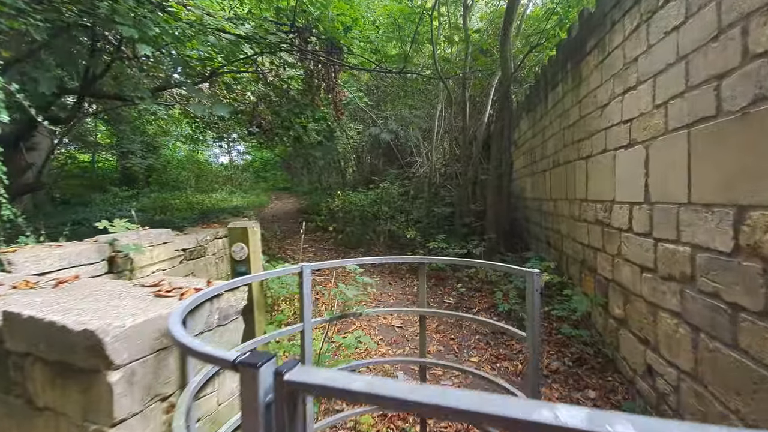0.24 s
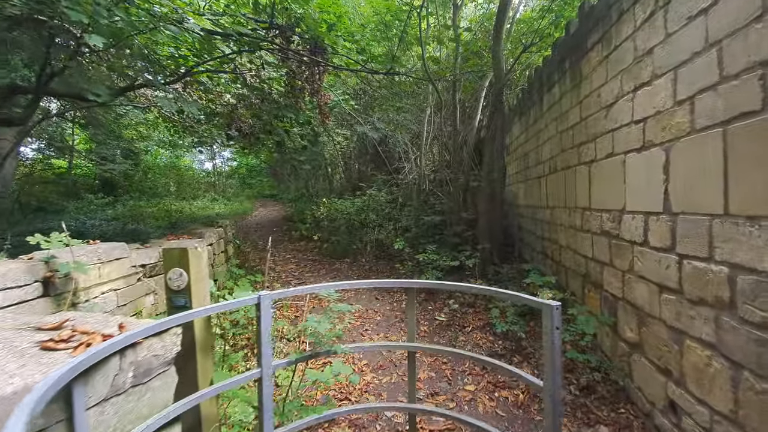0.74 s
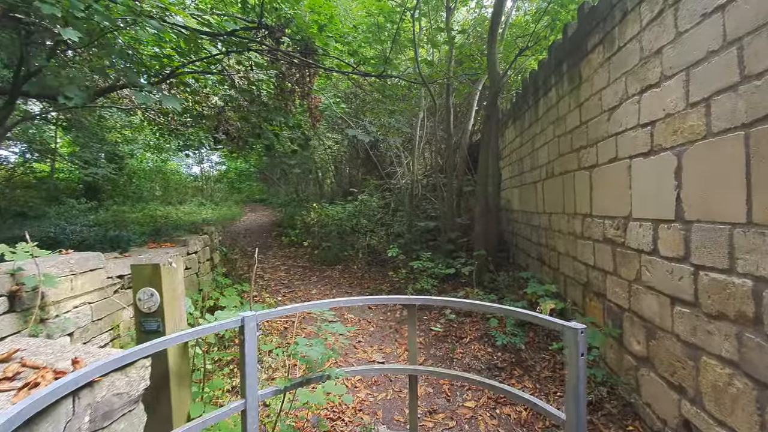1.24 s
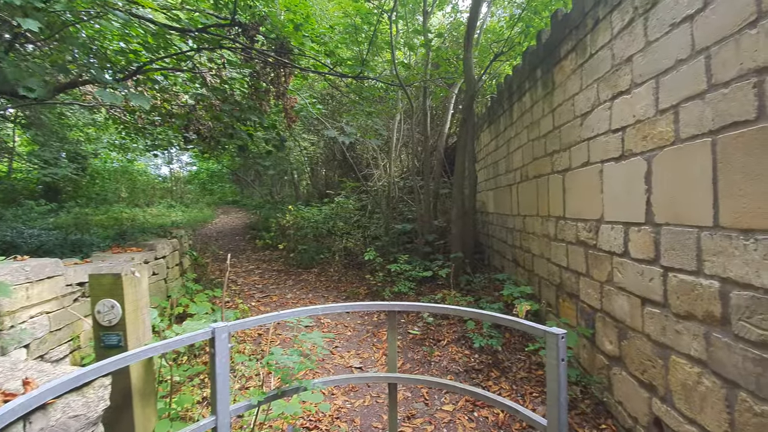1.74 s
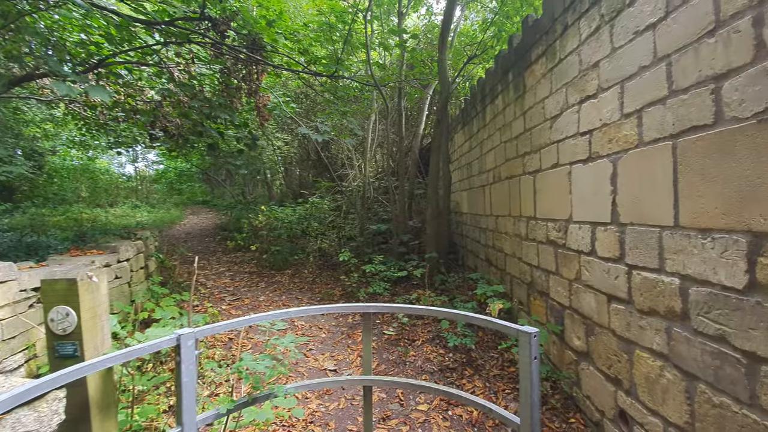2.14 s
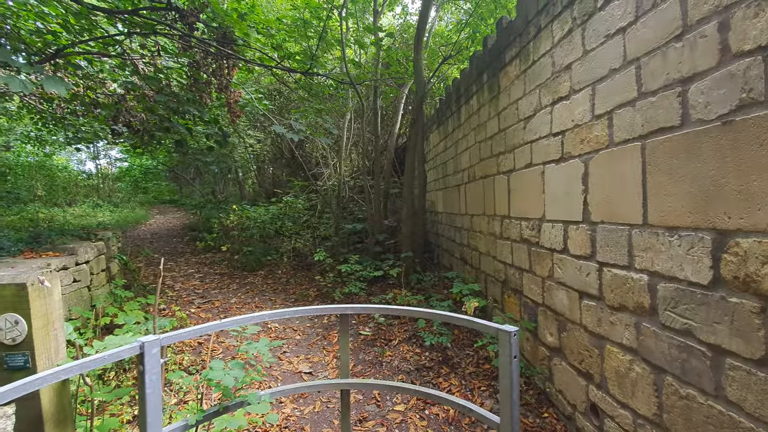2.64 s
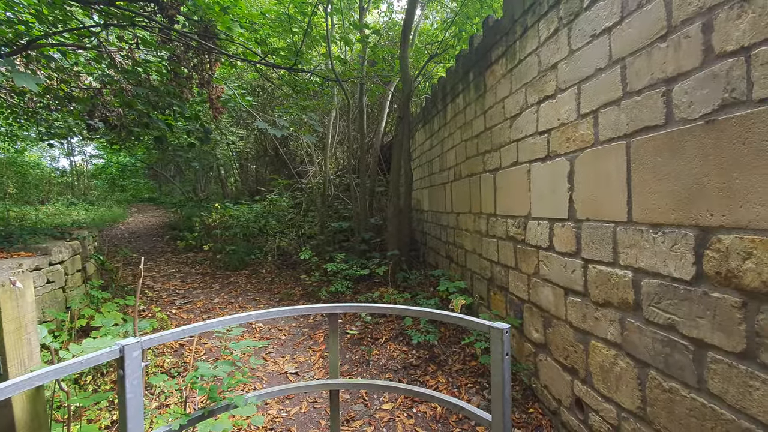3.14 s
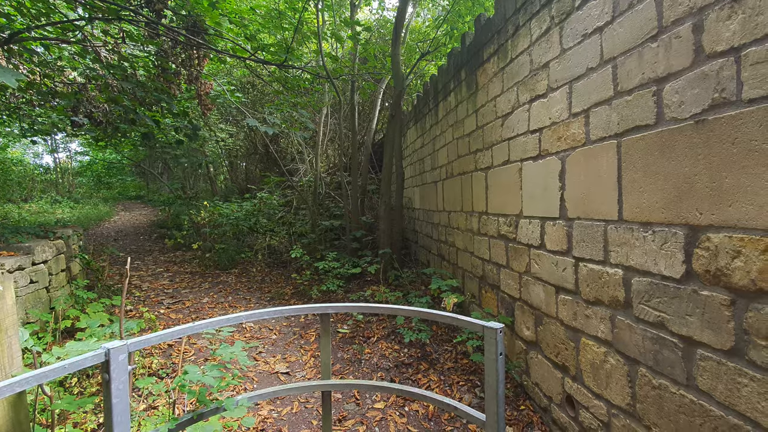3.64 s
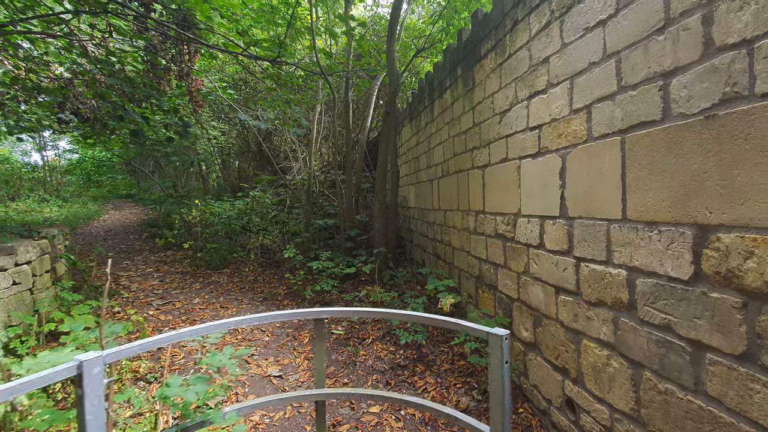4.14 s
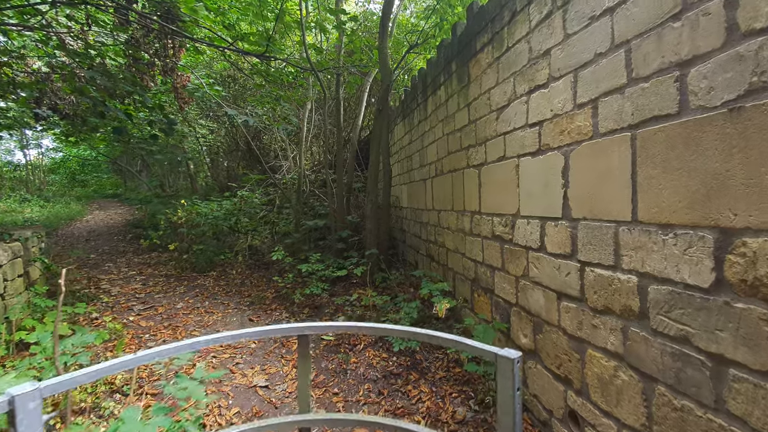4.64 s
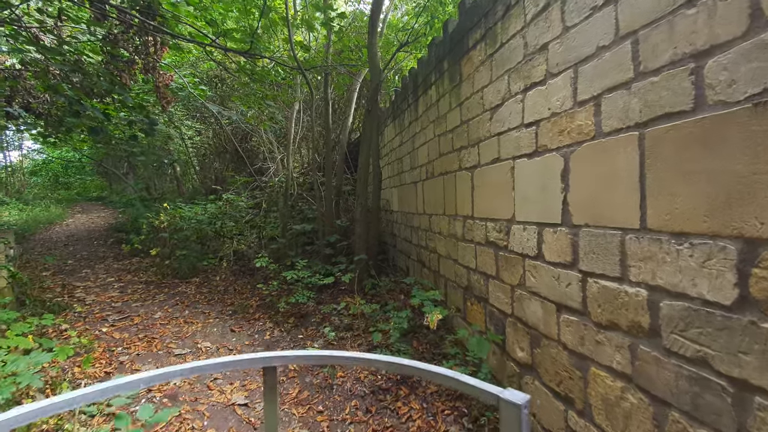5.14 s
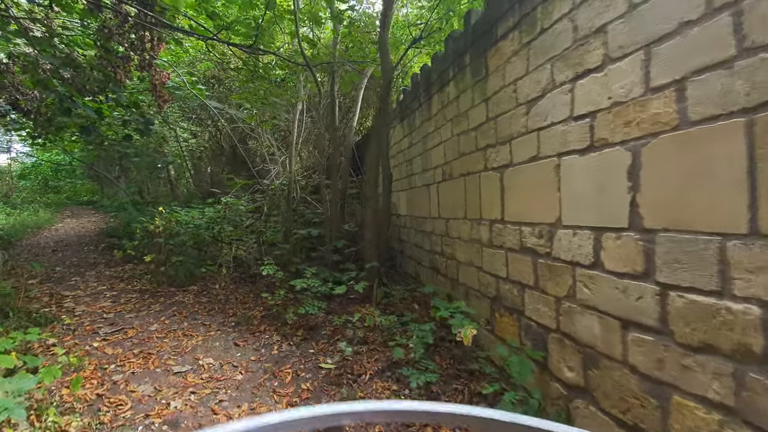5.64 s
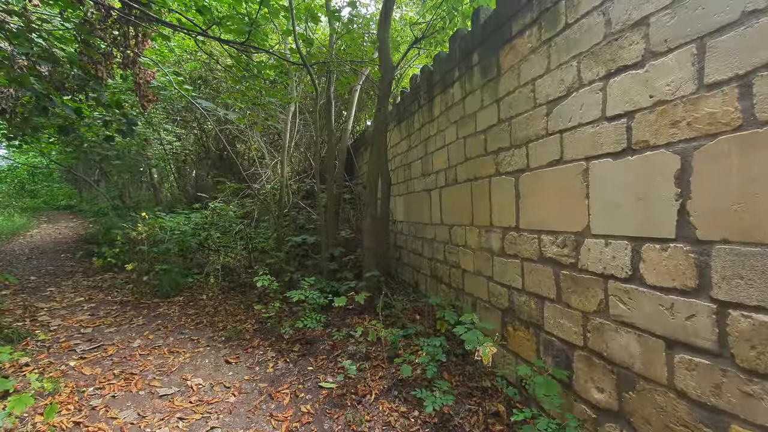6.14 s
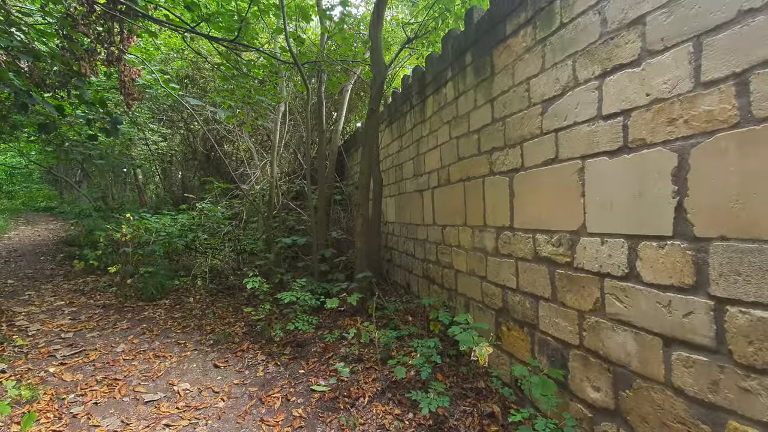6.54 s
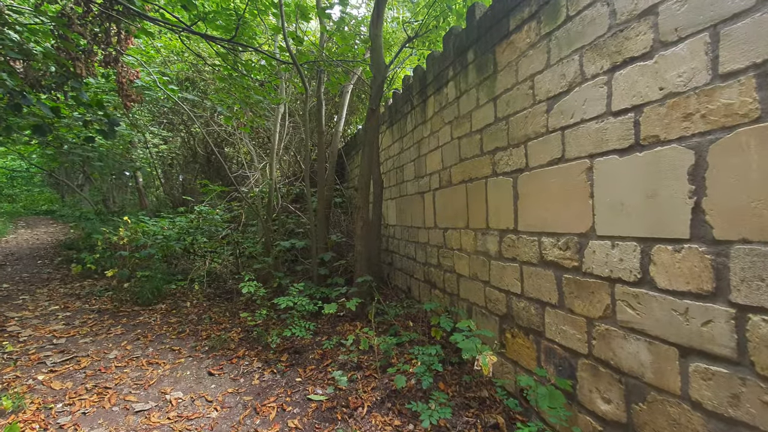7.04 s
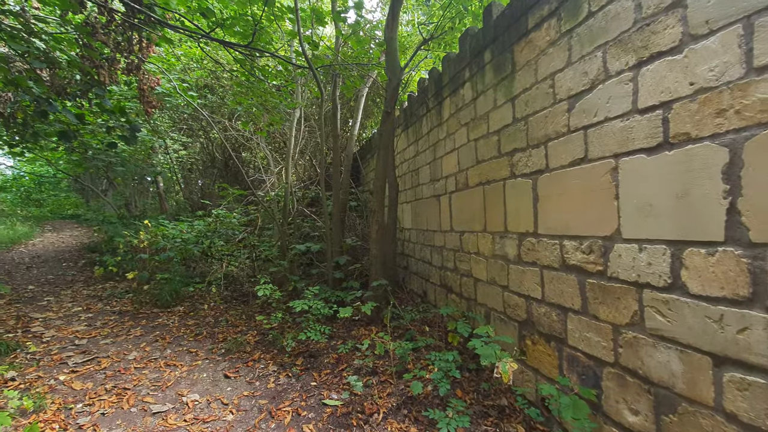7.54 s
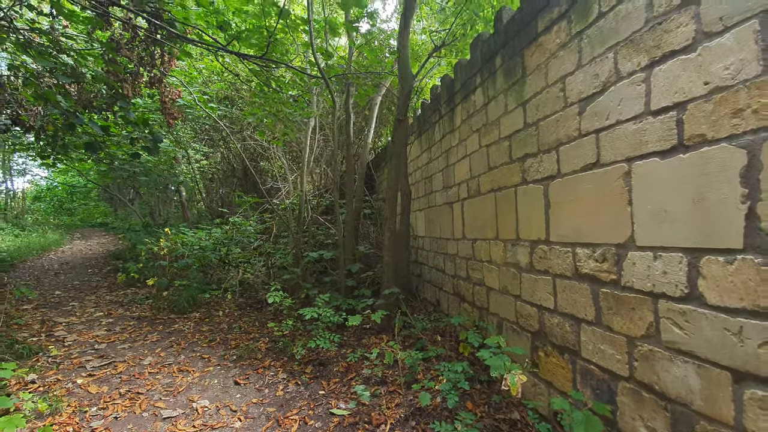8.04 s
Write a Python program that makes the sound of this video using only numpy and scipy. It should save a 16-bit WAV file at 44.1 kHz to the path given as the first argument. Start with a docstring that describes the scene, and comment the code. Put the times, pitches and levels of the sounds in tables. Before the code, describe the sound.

Outdoors on a leafy path beside a stone wall, faint birds twitter over distant traffic and hissing foliage as shoes rustle dry leaves. A hand-held steel gate knocks softly a few times, then clinks more firmly. After more scuffs and dull bumps on the microphone, the gate swings shut with a very loud, bright clang, rebounds with a rattle and rings out for about a second. Close handheld microphone, one channel.

```python
"""Small birds call over the hiss of leaves and far traffic, and dry leaves rustle under a walker's shoes.
The path runs between a stone wall and trees, where a held steel kissing gate knocks softly on its hoop.
Then it swings free, hums on its hinge, clangs shut and rebounds; bumps reach the microphone.
Steel is decaying sines plus noise bands, birds are gliding sines, leaves are random crackles,
snaps and air are filtered noise, bumps and hums are swelling tones."""
import sys
import numpy as np
from scipy import signal
from scipy.io import wavfile
from scipy.ndimage import uniform_filter1d, minimum_filter1d

SR = 44100
rng = np.random.default_rng(int(sys.argv[2]) if len(sys.argv) > 2 else 0)


def nominal_scale(level):
    """Amplitude ratio for a level in decibels (scalar or array-like)."""
    x = np.asarray(level, float) / 20
    return 10 ** x


def generate_wav(sig):
    """Save sig (samples, or channels by samples) to the path in sys.argv[1] as 16-bit PCM at SR."""
    pcm = np.round(np.clip(np.atleast_2d(sig).T, -1, 1) * 32767).astype(np.int16)
    wavfile.write(sys.argv[1], SR, pcm)


N = 366471


def rms_one(x):
    """Scale a sound to rms 1."""
    return x / np.sqrt(np.mean(x ** 2) + 1e-20)


def in_time(rows):
    """Read a (time_s, value) curve at every sample."""
    return np.interp(np.arange(N) / SR, *np.transpose(rows))


def at_hz(points, hz):
    """Read a (pitch_hz, value) curve on a logarithmic pitch axis."""
    curve_hz, values = np.transpose(points)
    return np.interp(np.log(hz), np.log(curve_hz), values)


def add(out, start_s, sound):
    """Mix a sound in from its start time."""
    i = round(start_s * SR)
    out[i:i + len(sound)] += sound[:N - i]


def drift(rate_hz):
    """Smooth random wander with rms 1: low-passed noise made at SR / 40, then interpolated."""
    r = np.exp(-80 * np.pi * rate_hz / SR)
    noise = rng.standard_normal(N // 40 + 2002)
    slow = signal.lfilter([1], [1, -2 * r, r * r], noise)[2000:]
    return np.interp(np.arange(N) / 40, np.arange(len(slow)), rms_one(slow))


def bands(pair, low_hz, high_hz, order=2):
    """Third-octave bands, dealt in turn from two unrelated signals."""
    edges = low_hz * 2 ** np.arange(0, np.log2(high_hz / low_hz), 1 / 3)
    for k, (low, high) in enumerate(zip(edges, edges[1:])):
        sos = signal.butter(order, [low, high], "band", fs=SR, output="sos")
        yield np.sqrt(low * high), signal.sosfilt(sos, pair[k % 2])


def coloured(pair, spectrum, patchy_db):
    """Give two white signals a spectrum whose bands each wander a little; rms 1."""
    top_hz = min(spectrum[-1][0] * 1.2, 20000)
    total = 0
    for hz, band in bands(pair, spectrum[0][0], top_hz):
        total = total + band * nominal_scale(at_hz(spectrum, hz) + patchy_db * drift(3))
    return rms_one(total)


def swells(rows):
    """Tones under a half-sine swell, from (start_s, level_db, pitch_hz, length_s)."""
    out = np.zeros(N)
    for start_s, level_db, pitch_hz, length_s in rows:
        t = np.arange(round(length_s * SR)) / SR
        envelope = nominal_scale(level_db) * np.sin(np.pi * t / length_s)
        add(out, start_s, envelope * np.sin(2 * np.pi * pitch_hz * t))
    return out


# gate contacts, mostly a tick and then the blow:
# strike_s, level_db, hardness_db (treble lift near 9 kHz before the shares below), kind
BLOWS = [(2.3136, -38.5, -4, "nudge"), (2.3184, -36, -4, "nudge"), (3.119, -29, -17, "lean"),
         (3.1239, -30.5, -17, "lean"), (3.4177, -44, -4, "tap"), (3.4255, -39.5, -4, "tap"),
         (4.6814, -33, -6, "push"), (4.6857, -19, 4, "push"), (7.0214, -3.5, 0, "slam"),
         (7.0271, -2, -3, "slam"), (7.2044, -20.5, -23, "rebound"), (7.21, -13, -25, "rebound"),
         (7.225, -10.5, 6, "rattle"), (7.2446, -13, -5, "rattle")]


def slam_s():
    """When the gate shuts: the first slam contact."""
    return min(row[0] for row in BLOWS if row[-1] == "slam")


# clear modes of the bars: pitch_hz, t60_s (before the hand damps them)
BARS = [(310, 1), (641, 1.5), (672, 1.1), (775, 1.4), (788, 1.15), (955, .4), (966, 1.5), (1071, .7),
        (1250, .7), (1320, 1.0), (1389, .45), (1495, .22), (1790, .3), (1960, .33), (2143, .28),
        (2449, .27), (2531, 1.35), (2607, .32), (2692, .42), (2724, .5), (2832, .65), (2881, .27),
        (2929, 1.5), (3114, .5), (3290, .27), (3464, .28), (3736, .45), (3798, .38), (3900, .2),
        (3992, .36), (4188, .2), (4517, .27), (4800, .23), (5356, .16), (5416, .2), (5590, .27), (6170, .2),
        (6930, .2), (8010, .18), (10150, .12)]
# relative level of each of those modes when the contact lands near its node: level_db
NODE_LEVELS = [-36, -32, -33, -36, -29, -23, -26, -28, -16, -24, -10, -20, -17, -16, -18, -16, -25, -17,
               -14, -13, -17, -10, -24, -26, -16, -18, -27, -19, -14, -22, -17, -13, -12, -10, -14, -15,
               -18, -21, -26, -30]
# modes that move most where each kind of contact lands: kind -> list of pitch_hz
FAVOURED = {"slam": [955, 1071, 2607, 3114, 3290, 3464, 3736, 3798, 3992], "rebound": [672, 775, 2531, 2692,
            2724, 2832, 2881, 4188, 4517, 10150], "rattle": [672, 775, 2531, 2692, 2724, 2832, 2881, 4517,
            4800], "push": [1495, 2143, 2832, 2881, 4800, 5356, 5416, 6170, 6930], "lean": [1320, 1495,
            1960, 2449, 3900, 3992, 5356, 5416, 5590, 6930, 8010], "nudge": [955, 1320, 1495, 1790, 1960,
            2143, 2607, 2881, 3114, 3900, 4188, 5356, 6170, 6930, 8010], "tap": [1960, 2143, 2449, 2607,
            2881, 3114, 4188, 5356, 6170]}
# kinds of contact: kind, hand_damping_db_per_s, then a lift_db at each pitch of CONTACT_HZ
CONTACTS = [("slam", 1, -5.5, -9, -6), ("rebound", 1, -4, -3, -3), ("rattle", 1, -6, -11, -14),
            ("push", 72, -8, -1, -5), ("lean", 76, 1, -1, -4), ("nudge", 80, 4, 2, 6),
            ("tap", 85, 2, -4, 8)]
# pitches where the contact lifts apply: pitch_hz
CONTACT_HZ = [800, 1350, 2300]
# relative colour of the crowd of modes too close to tell apart: pitch_hz, level_db
CROWD = [(150, -48.5), (250, -26), (646, -12.5), (717, -23.5), (945, -8), (1010, -6), (1430, -7),
         (1610, -6.5), (2800, -2), (3890, 2.5), (9070, -18.5), (10400, -22), (15500, -49)]
# ring time of the crowd before the hand damps it: pitch_hz, t60_s
CROWD_T60 = [(300, 1), (1000, 0.98), (2000, 0.7), (4000, 0.41), (9000, 0.17), (15000, .22)]
BARS_DB, CROWD_DB, FAVOUR_DB = -13, -4.5, 12
MODE_SPREAD_DB = 1.5  # random spread of each mode's level at each contact
MODE_TILT, TOP_SHARE = 0.57, 1.2  # share of the tilt the clear modes take; share of hardness at 15 kHz
DETUNE_HZ, NEIGHBOUR_DB = 8, -3  # detuning is divided by t60 squared: short-lived modes spread widest
CRACK_T60_S, RISE_S = 0.168, 0.00081


def gate():
    """Each contact rings clear modes and a dense crowd; a hand on the bar damps both."""
    out = np.zeros(N)
    t = np.arange(round(1.3 * SR)) / SR
    bar_hz = np.transpose(BARS)[0]

    # alike bars are never quite in tune: each mode has two neighbours
    hz, t60 = np.tile(np.transpose(BARS), 3)
    neighbour = np.arange(len(hz)) >= len(BARS)
    hz = hz + neighbour * DETUNE_HZ / t60 ** 2 * rng.uniform(-1, 1, len(hz))
    fade = np.exp(-np.log(1000) * t / t60[:, None])
    phase = 2 * np.pi * hz[:, None] * t
    sine, cosine = fade * np.sin(phase), fade * np.cos(phase)
    luck = rng.standard_normal((len(BLOWS), 2, len(hz)))

    # the first reflections along the bars die fastest, so an extra crack leads the crowd
    short = t[:round(.6 * SR)]
    noise = rng.standard_normal((2, len(BLOWS), len(short)))
    crowd = list(bands(noise, 220, 19000, order=3))
    crack = 1 + nominal_scale(-60 * short / CRACK_T60_S)
    dying = [crack * nominal_scale(at_hz(CROWD, f) - 60 * short / at_hz(CROWD_T60, f)) for f, _ in crowd]

    # the bending waves take a few ms to spread along the bars
    swell = (1 - np.exp(-t / RISE_S)) ** 2
    contacts = {kind: values for kind, *values in CONTACTS}
    for k, (strike_s, level_db, hardness_db, kind) in enumerate(BLOWS):
        hand_db_per_s, *lift_db = contacts[kind]
        tilt = [*zip(CONTACT_HZ, lift_db), (4500, 0), (9000, hardness_db), (15000, TOP_SHARE * hardness_db)]

        mode_db = np.tile(NODE_LEVELS + FAVOUR_DB * np.isin(bar_hz, FAVOURED[kind]), 3)
        mode_db = mode_db + BARS_DB + neighbour * NEIGHBOUR_DB
        mode_db = mode_db + MODE_SPREAD_DB * luck[k, 0] + MODE_TILT * at_hz(tilt, hz)
        size, start_phase = nominal_scale(mode_db), 9 * luck[k, 1]
        ring = (size * np.cos(start_phase)) @ sine + (size * np.sin(start_phase)) @ cosine

        crowd_ring = sum(band[k] * d * nominal_scale(at_hz(tilt, f)) for (f, band), d in zip(crowd, dying))
        ring[:len(short)] += nominal_scale(CROWD_DB) * crowd_ring
        # the swell begins 1 ms ahead of the strike
        add(out, strike_s - .001, ring * swell * nominal_scale(level_db - hand_db_per_s * t))
    return out


def hinge():
    """The dry hinge sings one sine, growing as the gate gathers speed and stopping at the slam."""
    pitch_hz, rms_db, full_s, grows_db_per_s = 462, -49, 6.975, 130
    t = np.arange(N) / SR
    db = rms_db + grows_db_per_s * np.minimum(t - full_s, 0)
    return np.sqrt(2) * nominal_scale(db) * (t < slam_s()) * np.sin(2 * np.pi * pitch_hz * t)


# relative colour of the shudder: pitch_hz, level_db (per Hz)
SHUDDER = [(60, -10), (150, -5), (270, 0), (550, -4), (1100, -10)]


def shudder():
    """After the slam the hoop and its posts shudder: low, rough noise that swells and dies."""
    level_db, swell_s, fade_s = -53.5, .25, .2
    t = np.maximum(np.arange(N) / SR - slam_s(), 0)
    envelope = (1 - np.exp(-t / swell_s)) * np.exp(-t / fade_s)
    noise = coloured(rng.standard_normal((2, N)), SHUDDER, patchy_db=1.0)
    return nominal_scale(level_db) * envelope / envelope.max() * noise


def woods(x, t60_s):
    """Scattered echoes from wall and trunks: a dying, dulled noise as impulse response."""
    treble_cut_hz, rise_s = 5000, 0.036
    t = np.arange(SR) / SR
    tail = rng.standard_normal(SR) * nominal_scale(-60 * t / t60_s) * np.minimum(t / rise_s, 1)
    r = np.exp(-2 * np.pi * treble_cut_hz / SR)
    tail = signal.lfilter([1], [1, -r], tail)
    return signal.fftconvolve(x, tail / np.sqrt(np.sum(tail ** 2)))[:N]


# shoes in dry leaves, cues for the foot pressure: start_s, level_db, held_s, fade_s (to fall 20 dB)
SCUFFS = [(.27, -70, .11, .05), (.396, -60, .005, .09), (.512, -63, .095, .04), (.665, -60, .01, .035),
          (.76, -62, .03, .05), (.80, -61, .01, .1), (.85, -62.5, .07, .3), (4.068, -63.5, .01, .3),
          (5.03, -69.5, 1.0, .6), (5.2, -68, .06, .07), (5.43, -67, .04, .12), (6.175, -63, .005, .05),
          (6.6, -66, .08, .1)]
# relative colour of the crackle: pitch_hz, level_db (per Hz)
LEAVES = [(710, -37), (1200, -7), (1260, -11.5), (2360, -9), (2700, -10.5), (4380, -2.5), (7630, -15.5),
          (14000, -35)]


def leaves():
    """Dense crackles of uneven size follow the pressure of the foot: rise, hold, fade."""
    rise_s = .025  # to rise 20 dB
    t = np.arange(N) / SR
    pressure = np.zeros(N)
    for start_s, level_db, held_s, fade_s in SCUFFS:
        rise, fall = (t - start_s) / rise_s, (start_s + held_s - t) / fade_s
        pressure += nominal_scale(level_db + 20 * np.minimum(np.minimum(rise, fall), 0))
    present = rng.random((2, N)) < 5000 / SR  # about 5000 crackles a second in each signal
    size = nominal_scale(3.5 * np.minimum(rng.exponential(1, (2, N)), 4))
    grains = present * size * rng.choice([-1, 1], (2, N))
    return pressure * coloured(grains, LEAVES, patchy_db=1.5)


# twigs and grit snap, cloth brushes: snap_s, level_db, pitch_hz, fade_s (to fall to 1/e)
SNAPS = [(.304, -51, 1190, 0.0091), (.396, -70, 5430, 0.0045), (.558, -48, 3970, .005),
         (.67, -54, 1100, .004), (5.92, -52, 527, .04), (5.934, -47, 603, 0.023), (5.947, -35, 299, 0.007),
         (5.9715, -52, 4500, 0.002), (6.326, -43, 2200, 0.00067), (6.334, -43.5, 960, 0.0048)]


def snaps():
    """Each snap is a short, dying puff of noise around its pitch."""
    out, t = np.zeros(N), np.arange(2500) / SR
    noise = rng.standard_normal((len(SNAPS), len(t)))
    for puff, (snap_s, level_db, pitch_hz, fade_s) in zip(noise, SNAPS):
        wide = signal.butter(2, [pitch_hz * .65, pitch_hz * 1.5], "band", fs=SR, output="sos")
        puff = rms_one(signal.sosfilt(wide, puff))
        add(out, snap_s - .001, nominal_scale(level_db) * puff * np.exp(-t / fade_s))  # starts 1 ms early
    return out


# bumps on the microphone: start_s, level_db, pitch_hz
BUMPS = [(3.457, -43, 45), (3.497, -45, 28.5), (3.53, -45, 28.5), (4.362, -51, 83), (5.875, -31, 61),
         (5.886, -30.5, 39), (5.9, -41, 206), (5.945, -35, 115), (5.958, -43, 70), (6.002, -48, 50),
         (6.1, -49, 163), (6.303, -40, 90), (6.331, -33, 167), (6.348, -40, 193), (6.365, -43, 45),
         (6.38, -49, 132), (6.41, -43, 40)]


def bumps():
    """Each bump is a low tone lasting 12 ms plus 1.2 of its own cycles."""
    return swells([(start_s, level_db, hz, .012 + 1.2 / hz) for start_s, level_db, hz in BUMPS])


# faint hums, perhaps a bar rubbed by hand or hinge: start_s, level_db, pitch_hz, length_s
HUMS = [(3.48, -58, 312.5, 0.17), (3.55, -62.5, 130.6, 0.28), (3.68, -65.5, 307, 0.42),
        (5.1, -68, 770, 0.63), (5.18, -60, 309, 0.074)]


def hums():
    """Faint tones of steady pitch that swell and fade over many cycles."""
    return swells(HUMS)


# bird notes: start_s, length_s, first_hz, last_hz, level_db (direct sound)
NOTES = [(0, .04, 6050, 6270, -57.5), (.03, 0.027, 6430, 7050, -63), (.133, 0.056, 4380, 4370, -50),
         (0.172, 0.044, 4700, 4930, -50), (0.19, .035, 4891, 4090, -55), (0.811, .015, 4300, 4370, -54),
         (0.866, 0.06, 3770, 3850, -50), (0.885, .02, 4270, 4200, -51), (0.978, 0.018, 4150, 4420, -55),
         (.99, .04, 4560, 4580, -58), (1.04, 0.038, 3510, 3480, -61), (1.054, 0.031, 3900, 4180, -57),
         (1.084, .035, 4250, 4370, -51), (1.125, 0.02, 4050, 4430, -54), (1.145, 0.011, 4090, 4210, -54),
         (1.217, .012, 4320, 4220, -57), (1.3, .04, 4550, 4570, -64), (1.679, 0.0064, 4380, 4280, -58),
         (1.039, 0.199, 2180, 2100, -64), (2.493, 0.17, 2173, 2070, -63), (5.215, 0.016, 5250, 5330, -56)]


def birds():
    """Gliding whistles with a fast random waver, heard directly and through the trees."""
    hoarse_hz, echo_db = 120, -6
    near = np.zeros(N)
    waver = drift(200)
    for start_s, length_s, first_hz, last_hz, level_db in NOTES:
        u = np.linspace(0, 1, round(length_s * SR))
        hz = first_hz + (last_hz - first_hz) * u
        hz = hz + hoarse_hz * waver[round(start_s * SR):][:len(u)]
        envelope = nominal_scale(level_db) * np.sin(np.pi * u) ** .5
        add(near, start_s, envelope * np.sin(2 * np.pi * np.cumsum(hz) / SR))
    return near + nominal_scale(echo_db) * woods(near, t60_s=0.74)


# relative colour of the far traffic: pitch_hz, level_db (per Hz)
RUMBLE = [(12, -29.5), (20, -4.5), (76, -3.5), (145, -7.5), (306, -9), (332, -8), (1090, -14), (1180, -17),
          (1360, -16), (2500, -29), (3250, -58.5), (5500, -120)]
# relative colour of the leaves overhead: pitch_hz, level_db (per Hz)
HISS = [(820, -10.5), (1400, -3.5), (2070, -10), (2440, -4), (2920, -6), (4740, -4), (6100, -15.5),
        (15600, -33.5)]
# loudness of the traffic over time: time_s, level_db
TRAFFIC = [(0, -62), (1.2, -61), (1.7, -62.5), (3.2, -63), (3.7, -60.5), (5.2, -59), (7.1, -59.5),
           (7.8, -62), (8.31, -63)]
# loudness of the leaf hiss over time: time_s, level_db
BREEZE = [(0, -65), (.8, -64), (1.6, -66), (3.6, -67), (4.4, -64), (5.7, -66), (7.0, -64.5), (8.31, -68.5)]


def background():
    """Noise coloured as far traffic and as leaves overhead, plus the microphone's own white noise."""
    rumble = coloured(rng.standard_normal((2, N)), RUMBLE, patchy_db=1.0)
    hiss = coloured(rng.standard_normal((2, N)), HISS, patchy_db=.4)
    mic_noise = nominal_scale(-84) * rng.standard_normal(N)
    return rumble * nominal_scale(in_time(TRAFFIC)) + hiss * nominal_scale(in_time(BREEZE)) + mic_noise


def scene():
    """Steel with its echoes, birds, the walker and the air, as one channel."""
    steel = gate() + hinge() + shudder()
    echoes = nominal_scale(-19) * woods(steel, t60_s=0.63)
    calls = birds()
    near = leaves() + snaps() + bumps() + hums()
    return (steel + echoes + calls + near + background())[None]


def top_cut(x):
    """Nothing passes above the cut-off."""
    return signal.sosfilt(signal.butter(12, 15710, fs=SR, output="sos"), x)


def record(dry):
    """A limiter that looks a few ms ahead holds the clang under full scale."""
    room_left = np.minimum(1, .97 / (np.abs(dry) + 1e-9))
    gain = uniform_filter1d(minimum_filter1d(room_left, size=401), size=201)
    return top_cut(dry * gain)


dry = scene()
out = record(dry)
generate_wav(out)
```